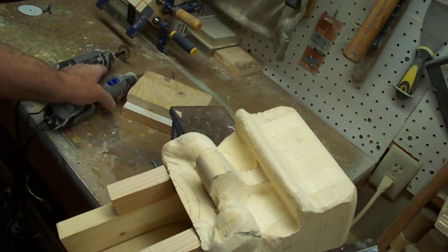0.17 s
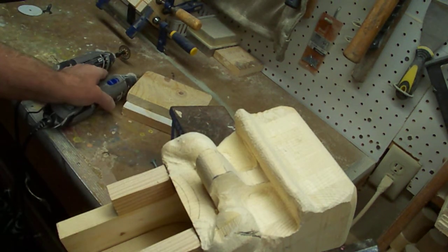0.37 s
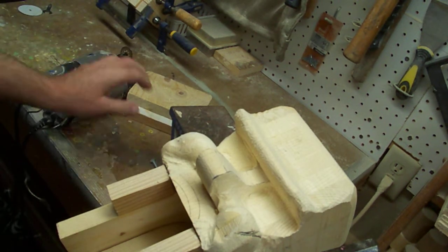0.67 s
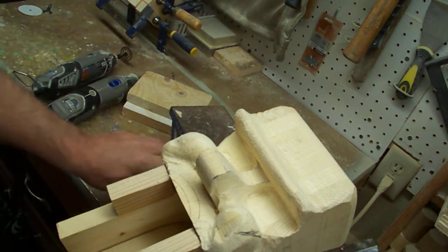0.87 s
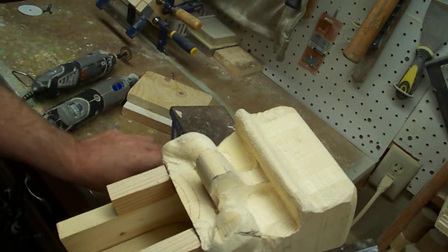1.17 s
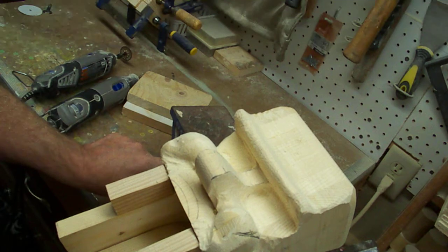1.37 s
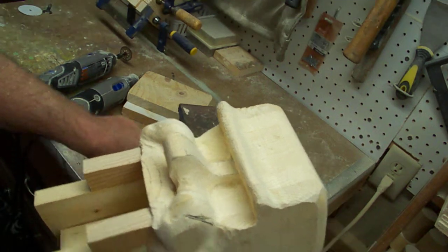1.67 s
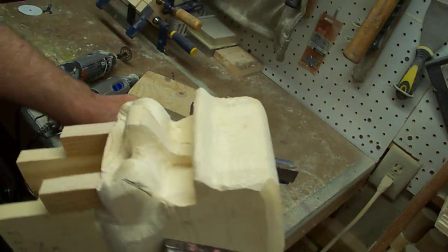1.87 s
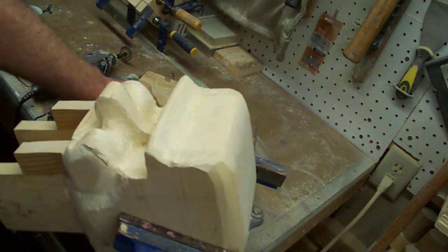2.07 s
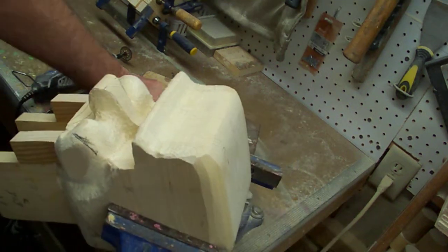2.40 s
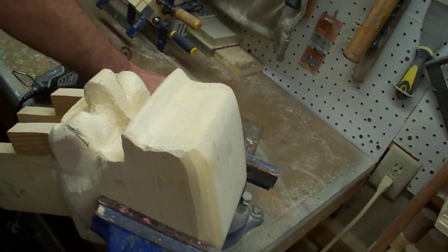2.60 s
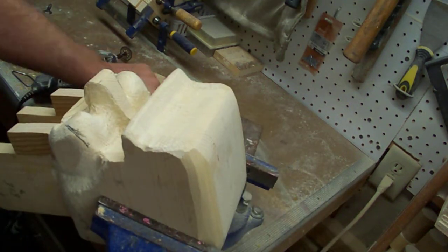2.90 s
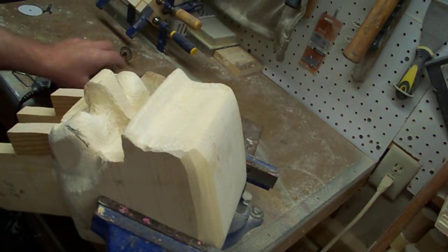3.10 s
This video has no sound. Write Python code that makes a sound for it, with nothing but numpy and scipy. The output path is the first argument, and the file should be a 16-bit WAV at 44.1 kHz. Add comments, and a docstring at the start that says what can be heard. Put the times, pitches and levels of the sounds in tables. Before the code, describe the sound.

A small rotary tool coasts down from the start, its whine falling steadily over a rush of air. At about 0.5 seconds it clacks onto a wooden bench and buzzes against it, fading. Dull close bumps and handling rumble come around 1.4, 1.9 and 2.6 seconds. The motor rubs softly to a stop near 3 seconds, as four faint, quick cricket-like chirps sound over a low hiss.

```python
"""At a wooden workbench, a small rotary tool, just switched off, coasts to a stop. It clacks down on
the wood and buzzes against it once a turn, while its fan whine falls through the casing's resonances,
the air rush dies away and the brushes rub ever more softly. Handling close to the microphone adds bumps
and rumble. In the quiet at the end something chirps four times, like a cricket, over a faint hiss."""
import sys
import numpy as np
from scipy import signal
from scipy.fft import rfft, irfft
from scipy.io import wavfile

SR = 44100
rng = np.random.default_rng(int(sys.argv[2]) if len(sys.argv) > 2 else 0)


def inscribe(sig):
    """Save sig as 16-bit PCM at rate SR to the path in sys.argv[1].

    A 1-D sig is mono; a 2-D sig holds one channel per row.
    Samples are clipped to [-1, 1] before scaling.
    """
    pcm = np.round(np.clip(np.atleast_2d(sig).T, -1, 1) * 32767)
    wavfile.write(sys.argv[1], SR, pcm.astype(np.int16))


N = 143325

# Shaft spin-down: t/s, rotation f/Hz
SHAFT_SPEED = [(0, 347), (.1, 332), (.45, 286.5), (.8, 240.6), (1.14, 197.6), (1.7, 136.8), (2.3, 73.5),
               (2.97, 2)]
# Casing resonances: f/Hz, width/Hz, level/dB (all table levels are relative)
CASING_MODES = [(794, 69, 1.5), (1081.5, 57, 7.5), (1383, 101, 5), (2100, 252, 0), (2873, 77, 1.5),
                (3560, 870, -19), (6160, 860, -1)]
# How well the small housing radiates tones: f/Hz, level/dB
RADIATION_EQ = [(560, -5.5), (740, -1), (5000, 1), (6300, -2.5), (7500, 2)]
# Unbalance hum envelope: t/s, level/dB
HUM_ENV = [(0, -41.5), (.45, -39), (1.0, -46.5), (1.3, -45.5), (1.68, -39), (1.8, -48), (2.2, -49),
           (2.5, -52)]
# Overtones of the eight-bladed fan: shaft multiple, level/dB
FAN_PARTIALS = [(8, -8), (16, -7), (32, 0), (40, -3), (48, -1), (56, -5), (64, -7)]
# Fan tone envelope: t/s, level/dB
FAN_ENV = [(0, -50), (1.85, -50), (2.5, -62), (2.9, -88)]
# Fan whistle envelope: t/s, level/dB
WHISTLE_ENV = [(.08, -30), (.2, -20), (.41, -18), (.47, -28), (.54, -22), (.6, -31), (.66, -33), (.71, -38),
               (.79, -42), (.86, -28), (.93, -42), (1.02, -30), (1.1, -47), (1.16, -35), (1.21, -35),
               (1.27, -46), (1.6, -44), (2.15, -52), (2.45, -66), (2.58, -71), (2.68, -63), (2.8, -85)]
# Motor and commutator tones: shaft multiple, level/dB
MOTOR_PARTIALS = [(2, -8), (3, -3), (4, -1.5), (5, -1.5), (6, -0.5), (10, -8), (12, -3)]
# Motor and bearing envelope: t/s, level/dB
MOTOR_ENV = [(0, -37), (.55, -30), (.8, -37), (1.3, -43), (1.8, -55), (2.3, -66), (2.8, -85)]
# How hard the housing chatters: t/s, level/dB
CHATTER_ENV = [(0, -27.5), (.3, -22.5), (.44, -45.5), (.48, -23.5), (.75, -22), (.93, -34), (1.1, -27),
               (1.35, -36.5), (1.75, -49), (2.8, -75.5)]
# Colour of the scrapes and clacks: f/Hz, level/dB
CHATTER_EQ = [(400, -21), (800, -26.5), (1200, 4), (2000, 0.5), (3200, 6.5), (4200, -11), (8000, -11.5)]
# The housing hits the bench: t/s, level/dB
CLACK_HITS = [(.466, -8), (.481, -9), (.497, -9)]
# Air rush envelope: t/s, level/dB
AIR_ENV = [(0, -18), (.33, -19.5), (.44, -19.5), (.5, -22), (.9, -26), (1.15, -31), (1.5, -31.5),
           (1.9, -43.5), (2.9, -59.5)]
# Air rush colour: f/Hz, level/dB
AIR_EQ = [(40, -27.5), (130, -25.5), (330, -38), (620, -12.5), (1100, -0.5), (3100, -2.5), (4200, -1.5),
          (7600, -7.5)]
# Brush rub envelope: t/s, level/dB
BRUSH_ENV = [(0, -30), (1.6, -37), (2.1, -39), (2.45, -40), (2.65, -44), (2.82, -51), (2.95, -62),
             (3.25, -87)]
# Brush rub colour: f/Hz, level/dB
BRUSH_EQ = [(260, -15.5), (380, 3.5), (600, -9), (850, 6), (1400, -8.5), (2200, 5), (7000, 2.5)]
# Bumps on the bench: t/s, level/dB, ring f/Hz, decay/s
BUMP_HITS = [(0.463, -26.5, 123, 0.025), (1.35, -25.5, 51.6, 0.035), (1.36, -30.5, 177, 0.04),
             (1.948, -30.5, 107, 0.02), (2.575, -40, 76.5, 0.013)]
# Handling rumble envelope: t/s, level/dB
RUMBLE_ENV = [(0, -61), (1.28, -44), (1.38, -46), (1.55, -40), (1.95, -34), (2.2, -47), (2.4, -55),
              (2.56, -39), (2.8, -57), (3.25, -51.5)]
# Handling rumble colour: f/Hz, level/dB
RUMBLE_EQ = [(30, 6), (70, -5.5), (140, -3), (300, -27), (700, -25), (2000, -80.5)]
# Chirp onsets: t/s, level/dB
CHIRP_PULSES = [(2.793, -56), (2.842, -55), (2.897, -54), (2.955, -54)]
# Colour of the hiss bed: f/Hz, level/dB
HISS_EQ = [(100, -3), (300, 4), (800, 0.5), (1500, -13), (4200, -9), (5100, 5), (5700, -16), (6300, -3),
           (7600, -21)]
# The tool's stereo lean: f/Hz, left minus right level/dB
TOOL_PAN = [(300, 2.5), (950, 0), (1600, -0.5), (2800, 5.5), (4900, 1.5), (7000, -2.5)]

LAID_S, FREE_S = .466, .375  # touchdown; the grip loosens just before it
BUZZ_DB, FREE_BOOST_DB = -7, 6
SWELL_DB, SWELL_PER_S, FLUTTER_DEPTH, FLUTTER_PER_S = 3.2, 14, .28, 90
CHATTER_SCATTER_DB, SCRAPE_DECAY_TURNS, CLACK_DECAY_S = 1.7, .35, .0025
BUMP_REL_WIDTH, BUMP_ATTACK_S, BUMP_GRAIN = .9, .004, .6
CHIRP_HZ, CHIRP_SAG_HZ_PER_S, CHIRP_S, CHIRP_RIGHT_DB = 4500, 7000, .023, 4
ROOM_T60_S, PREDELAY_S, LEFT_LAG_S = .13, .002, .000062
CONVERTER_HZ, BAND_HZ, TOP_HZ = 16000, 7700, 8750
T = np.arange(N) / SR
FREQS = np.fft.rfftfreq(2 * N, 1 / SR) + 1e-3


def whine(speed, turns):
    """The falling tone layer: unbalance hum under motor and fan, which sound through the casing."""
    hum = np.sqrt(2) * np.sin(2 * np.pi * turns) * envelope(HUM_ENV)
    tones = motor(speed, turns) + fan(speed, turns)
    return hum + shape(tones, casing() * colour(RADIATION_EQ))


def motor(speed, turns):
    """Motor and commutator tones, with a bearing buzz that jumps up while the grip is loose."""
    tones = sum(undb(db) * partial(k, speed, turns) for k, db in MOTOR_PARTIALS)
    buzz = sum(partial(k, speed, turns) / np.sqrt(k / 7) for k in range(7, 23))
    loose = (T > FREE_S) & (T < LAID_S)
    return (tones + buzz * undb(BUZZ_DB + FREE_BOOST_DB * loose)) * envelope(MOTOR_ENV)


def fan(speed, turns):
    """Blade-pass harmonics; the third whistles on its own envelope."""
    blades = sum(undb(db) * partial(k, speed, turns) for k, db in FAN_PARTIALS)
    return blades * envelope(FAN_ENV) + partial(24, speed, turns) * envelope(WHISTLE_ENV)


def partial(multiple, speed, turns):
    """One tone locked to the shaft, swelling slowly and fluttering fast; muted above the band."""
    swell = undb(SWELL_DB * wander(SWELL_PER_S))
    flutter = 1 + FLUTTER_DEPTH * (wander(FLUTTER_PER_S) + 1j * wander(FLUTTER_PER_S))
    in_band = np.clip((CONVERTER_HZ / 2 - multiple * speed) / 200, 0, 1)
    carrier = np.exp(2j * np.pi * (multiple * turns + rng.random()))
    return np.sqrt(2) * in_band * np.imag(swell * flutter * carrier)


def casing():
    """The tool's body: whatever sweeps through a resonance flares up."""
    return 1 + sum(undb(db) * resonance(hz, width) for hz, width, db in CASING_MODES)


def chatter(turns):
    """Once a turn the housing scrapes, never twice alike; it clacks as it is laid down."""
    strength = undb(CHATTER_SCATTER_DB * rng.standard_normal(N))[turns.astype(int)]
    scrapes = unit(strength * np.exp(-(turns % 1) / SCRAPE_DECAY_TURNS)) * envelope(CHATTER_ENV)
    clacks = sum(undb(db) * fade(start, CLACK_DECAY_S) for start, db in CLACK_HITS)
    return noise(colour(CHATTER_EQ) * casing()) * np.hypot(scrapes, clacks)


def air_rush():
    """The fan pushes air through the vents: a broad, dying whoosh."""
    return noise(colour(AIR_EQ)) * envelope(AIR_ENV)


def brushes(turns, ripple_depth=.17):
    """The brushes rub and ring the casing, their rub rippling eight times a turn."""
    ripple = 1 + ripple_depth * np.sin(2 * np.pi * 8 * turns)
    rub = shape(rng.standard_normal(N) * ripple, colour(BRUSH_EQ) * casing())
    return unit(rub) * envelope(BRUSH_ENV)


def handling():
    """Close, mono low end: handling rumble and dull, grainy bumps on the bench."""
    out = noise(colour(RUMBLE_EQ)) * envelope(RUMBLE_ENV)
    for start, db, hz, decay in BUMP_HITS:
        grain = noise(resonance(hz, hz * BUMP_REL_WIDTH) * resonance(hz, 1200))
        ring = np.sin(2 * np.pi * hz * (T - start)) + BUMP_GRAIN * grain
        out += undb(db) * ring * (fade(start, decay) - fade(start, BUMP_ATTACK_S))
    return out


def chirps():
    """Four short cricket-like pulses, each sagging in pitch."""
    out = 0
    for start, db in CHIRP_PULSES:
        age = np.clip(T - start, 0, CHIRP_S)
        cycles = age * (CHIRP_HZ - CHIRP_SAG_HZ_PER_S * age / 2)
        out += undb(db) * np.sin(np.pi * age / CHIRP_S) * np.sin(2 * np.pi * cycles)
    return 2 * out


def hiss(level_db=-57):
    """A faint, steady noise bed."""
    return noise(colour(HISS_EQ)) * undb(level_db)


def workshop(x, room_db):
    """Adds the short reverb tail of a cluttered room."""
    tail = rng.standard_normal((2, N)) * fade(PREDELAY_S, ROOM_T60_S / np.log(1000))
    tail /= np.sqrt(np.sum(tail ** 2, axis=1, keepdims=True))
    return stereo(x, shape(x, rfft(tail, 2 * N)), room_db)


def stereo(direct, room, room_db):
    """Direct sound reaches the left a touch late; the room's bass is thinned and near mono."""
    left, right = rfft(room, 2 * N)
    alike = 1 / (1 + (FREQS / 1300) ** 2)
    low_cut = 1 / (1 + (400 / FREQS) ** 2)
    diffuse = np.array([left, alike * left + np.sqrt(1 - alike ** 2) * right]) * low_cut
    near = rfft(direct, 2 * N) * np.exp(-2j * np.pi * FREQS * np.array([[LEFT_LAG_S], [0]]))
    return irfft(near + undb(room_db) * diffuse)[:, :N] / np.sqrt(1 + undb(room_db) ** 2)


def undb(db):
    """Decibels to gain."""
    return 10 ** (np.asarray(db) / 20)


def curve(rows):
    """Straight ramps between breakpoints in time."""
    return np.interp(T, *np.array(rows).T)


def envelope(rows):
    """Gain over time from rows of t/s, level/dB."""
    return undb(curve(rows))


def fade(start, decay):
    """Hard attack, exponential decay."""
    return (T >= start) * np.exp(-np.abs(T - start) / decay)


def wander(rate):
    """Random drift with `rate` breakpoints a second."""
    return np.interp(T * rate, np.arange(999), rng.standard_normal(999))


def colour(rows):
    """EQ curve from rows of f/Hz, level/dB."""
    hz, db = np.array(rows).T
    return undb(np.interp(np.log(FREQS), np.log(hz), db))


def resonance(hz, width):
    """Response of one damped resonance."""
    return 1 / (1 + 1j * (FREQS ** 2 - hz ** 2) / (FREQS * width))


def shape(x, response):
    """Filter by a frequency response."""
    return irfft(rfft(x, 2 * N) * response)[..., :N]


def unit(x):
    """Scale to rms 1."""
    return x / np.sqrt(np.mean(x ** 2))


def noise(response):
    """Coloured noise of rms 1."""
    return unit(shape(rng.standard_normal(N), response))


def scene():
    """The mix: tool and handling up front, chirps and hiss behind."""
    speed = curve(SHAFT_SPEED)
    turns = np.cumsum(speed) / SR
    # Three layers of each noise: one direct, two for the room.
    rush = np.array([brushes(turns) + air_rush() for _ in range(3)])
    bed = np.array([hiss() for _ in range(3)])
    tool = workshop(whine(speed, turns), room_db=-12) + workshop(chatter(turns), room_db=-4)
    tool += stereo(rush[0], rush[1:], room_db=-.5)
    lean = np.sqrt(colour(TOOL_PAN))
    background = workshop(chirps(), room_db=-1) * undb([[0], [CHIRP_RIGHT_DB]])
    background += stereo(bed[0], bed[1:], room_db=17)
    return shape(tool, np.array([lean, 1 / lean])) + handling() + background


def record(dry, image_db=-27.5):
    """Narrow-band finish: the top of the band is faintly mirrored upwards, then cut."""
    band = shape(dry, 1 / np.sqrt(1 + (FREQS / BAND_HZ) ** 90))
    image = undb(image_db) * 2 * band * np.cos(2 * np.pi * CONVERTER_HZ * T)
    high_cut = signal.ellip(10, .2, 80, TOP_HZ, fs=SR, output="sos")
    return signal.sosfilt(high_cut, band + image)


dry = scene()
out = record(dry)
inscribe(out)
```